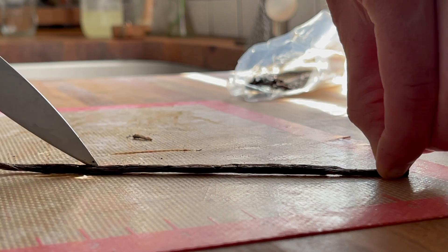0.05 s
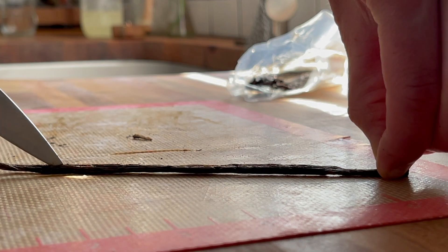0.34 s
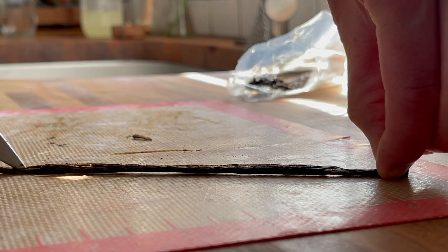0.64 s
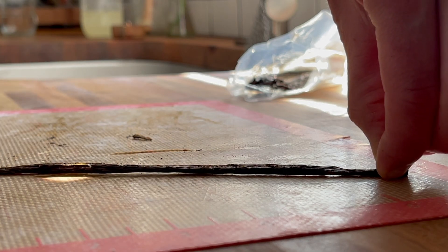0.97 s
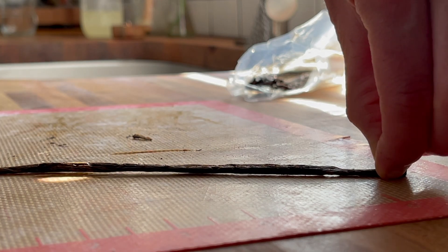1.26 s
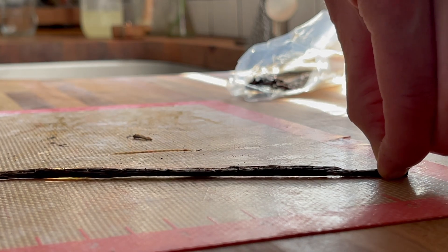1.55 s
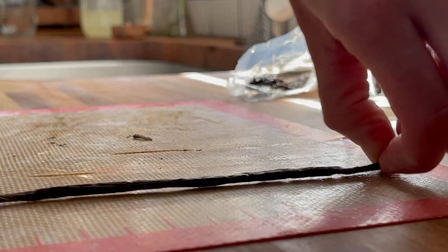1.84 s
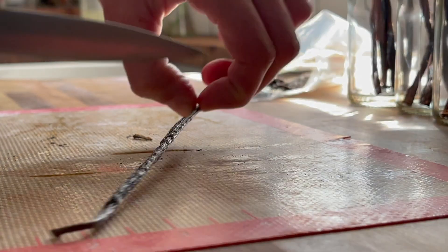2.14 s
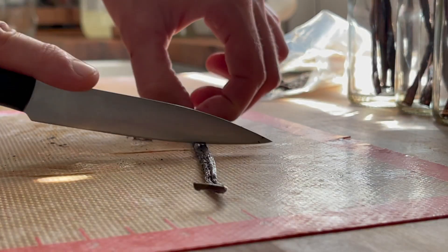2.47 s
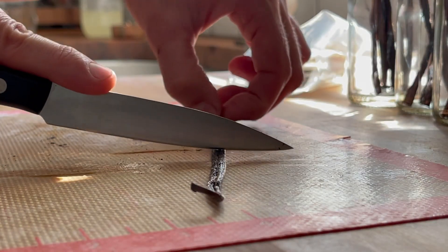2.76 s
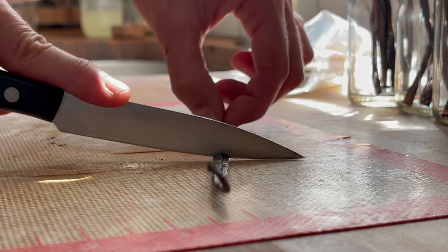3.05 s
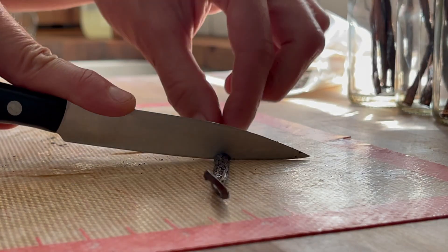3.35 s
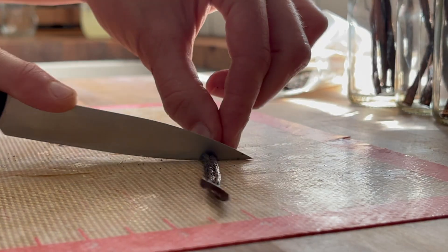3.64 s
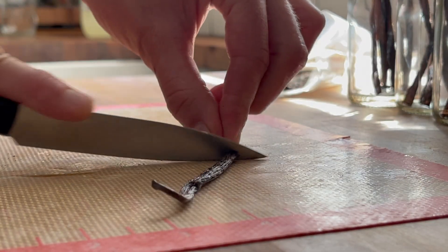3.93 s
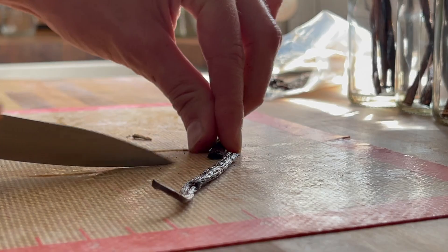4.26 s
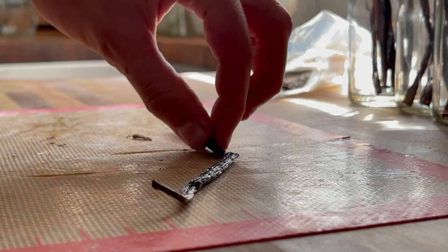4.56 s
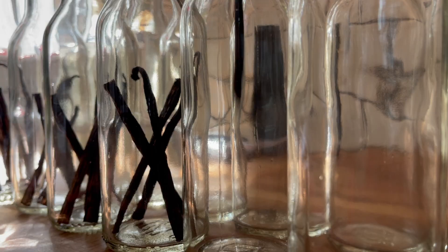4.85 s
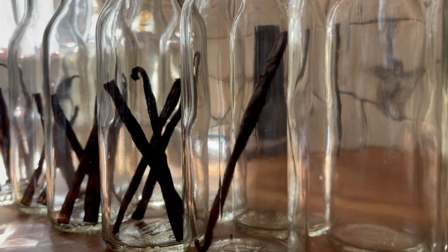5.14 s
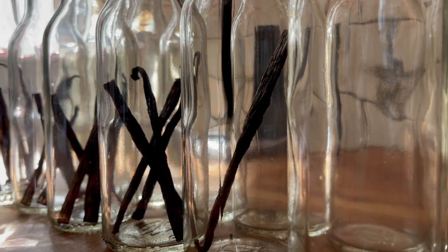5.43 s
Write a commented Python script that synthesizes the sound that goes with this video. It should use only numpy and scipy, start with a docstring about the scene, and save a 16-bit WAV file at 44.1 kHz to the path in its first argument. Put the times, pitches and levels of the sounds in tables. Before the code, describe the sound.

Heard close up in a quiet kitchen, a blade draws softly through a vanilla pod, ticking lightly before it knocks sharply on the wooden board beneath. After a short lull comes more cutting, with low rubbing, dry snaps and light taps. Then the pod lands in a small glass bottle with soft thuds, and the glass rocks and clinks against another bottle over a faint electrical hum.

```python
"""Soft scraping, small snaps and wooden knocks, then a few thuds and bright clinks of glass.
A knife slits a vanilla pod on a mat over a wooden board, knocks down off its end, then cuts it in two.
The pieces drop into a small glass bottle, which thuds, rocks and clinks against its neighbour.
It all sounds close, in a quiet kitchen with a faint mains hum."""
import sys
import numpy as np
from scipy import signal
from scipy.fft import rfft, irfft
from scipy.io import wavfile
from scipy.ndimage import uniform_filter1d

SR = 44100
rng = np.random.default_rng(int(sys.argv[2]) if len(sys.argv) > 2 else 0)


def unload_wav(signal):
    """Save mono or channel-first audio to the path in sys.argv[1] as 16-bit WAV at rate SR, clipped to [-1, 1]."""
    wavfile.write(
        sys.argv[1],
        SR,
        np.round(np.clip(np.atleast_2d(signal).T, -1, 1) * 32767).astype(np.int16),
    )


N = 246959
T = np.arange(N) / SR
HIT_T = T[:SR // 2]  # the half second that one hit lasts


def knife_knocks(push_hz=620):
    """The blade hits the board: a push, a clack, and ringing tones that depend on where it lands."""
    # Each row: pitch in Hz, fade time in seconds, level in dB if hit in the middle, and at the edge.
    board_tones = [(100, 0.14, 3, -5.5), (164.4, 0.14, 2.5, -4.5), (191.5, .24, 3.5, -5.5),
                   (284, 0.049, -31, 1), (347.6, 0.18, -8, -10.5), (393.2, 0.083, 6, -14),
                   (444.3, 0.1, -2, -1.5), (512.5, 0.062, -12.5, -1.5), (547, 0.059, -19, -4.5),
                   (532.4, 0.077, -19, -7), (649, 0.094, -29, 0), (713, 0.25, -23, -7.5),
                   (750, 0.067, -49, -3), (842, 0.15, -18, -9.5), (930, .06, -9, -16),
                   (970, 0.093, -1, -4.5), (1130, 0.025, 0.5, -29), (1177, 0.18, -1, -53),
                   (1226, 0.046, -12.5, -12), (2016, 0.014, 4, -3.5)]
    # Each row: start in seconds, level in dB, hardness in Hz, place from 0 (middle) to 1 (edge).
    hits = [(0.187, -58, 1200, 0.06), (0.2104, -42.5, 1210, 0.47), (0.4862, -45, 323, 0.69),
            (0.637, -57, 400, 0.99), (1.4046, -20, 1010, 0.99), (3.0862, -34.5, 2520, 0.36),
            (3.1822, -59, 1200, 0.12), (3.219, -42.5, 400, 0.23), (3.241, -48.5, 445, 0.44),
            (3.272, -48, 790, 0.11), (3.298, -51.5, 793, 0.021), (3.437, -62.5, 2030, 0.058),
            (3.6396, -35, 3220, 0.68), (3.705, -51, 1290, 0.03), (4.113, -57.5, 1200, 0.12),
            (4.232, -51.5, 2000, 0.68), (4.572, -61, 2510, 0)]
    out = np.zeros(N)
    hz, fade_s, middle_db, edge_db = np.transpose(board_tones)
    phase = np.pi * (push_hz * HIT_T - 1)
    push = gain(10) * (1 - 2 * phase ** 2) * np.exp(-phase ** 2)  # the board gives and springs back
    for start, db, hard_hz, place in hits:
        wood = ring(hz, fade_s, middle_db + place * (edge_db - middle_db))
        clack = gain(4) * burst(hz=680, width=1.35, fade_s=0.037, order=4)
        add(out, start, gain(db) * soften(push + wood + clack, hard_hz))
    return out


def pod_snaps():
    """The blade parts the pod or ticks on the mat: a dry crack with a brief ring."""
    # Each row: start in seconds, level in dB, centre pitch in Hz, width as a share of that pitch.
    snaps = [(0.187, -52, 3200, 1.4), (.2112, -39.5, 2200, 3.6), (.4605, -54, 3350, 1.8),
             (0.5192, -53, 4530, 1.2), (1.4058, -27.5, 3030, 1.83), (2.832, -59, 5530, 1),
             (3.034, -63, 4000, 0.7), (3.0862, -35.5, 2080, 1.8), (3.179, -54, 4360, .7),
             (3.247, -57, 4000, 0.42), (3.3, -48, 4920, 1.25), (3.4359, -51, 3380, 1.5),
             (3.6277, -43.5, 9600, 6.9), (3.6393, -29, 5900, 1.26), (3.784, -56, 7900, .8),
             (3.943, -50.5, 7360, 1), (4.08, -53, 8500, 1.1), (4.0939, -38, 5670, 2.7),
             (4.118, -51.5, 5040, 1.4), (4.2323, -41.5, 3330, 1.34), (4.375, -59, 5400, 0.52),
             (4.5541, -62, 6800, 0.88)]
    out = np.zeros(N)
    for start, db, hz, width in snaps:
        crack = burst(hz, width, fade_s=0.025, order=2)
        ringing = gain(-7) * burst(hz, width=0.16, fade_s=0.027, order=2)
        add(out, start, gain(db) * (crack + ringing))
    return out


def cutting(grains_per_s=5000, spread_db=4.1):
    """Pressing makes the board rumble; the mat rubs, fibres tear and the blade slides in tiny clicks."""
    # Each row: start in seconds, length in seconds, pressure of the hand in dB.
    pushes = [(0.0, 0.033, -55.5), (.18, 0.074, -43), (.375, 0.17, -47), (.53, 0.26, -48.5),
              (.82, 0.12, -53), (1.14, 0.34, -61), (2.45, 0.036, -60.5), (2.98, 0.18, -47.5),
              (3.21, 0.11, -46.5), (3.36, .17, -51.5), (3.66, 0.15, -51.5), (3.83, 0.12, -54),
              (4.08, 0.05, -56), (4.27, 0.16, -48), (4.46, 0.09, -50), (4.7, 0.11, -53), (5.13, 0.35, -63)]
    # Each row: start in seconds, length in seconds, tearing in dB, hiss of the blade in dB.
    cuts = [(.175, 0.054, -62.5, -65), (.41, .07, -69.5, -84), (.48, 0.48, -73, -86),
            (.605, 0.039, -64.5, -78), (2.96, 0.6, -70, -74), (3.17, 0.13, -69.5, -80),
            (3.46, 0.2, -67, -65), (3.7, 0.12, -69.5, -73), (3.945, 0.029, -63.5, -68),
            (3.985, .04, -71, -62.5), (4.04, 0.16, -69.5, -74), (4.26, 0.12, -69, -68),
            (4.4, 0.25, -72.5, -74)]
    # The tone of each of the four noises. Each row: pitch in Hz, relative level in dB.
    board_rumble = [(15, -51), (25, 9), (64, -8), (103, 5), (152, -14), (200, -0.5), (248, -15),
                    (339, -34.5), (384, -21.5), (500, -16), (650, -63), (1100, -120)]
    mat_rub = [(200, -33.5), (300, -5), (390, -12), (575, -13), (700, -10), (850, -17.5), (990, -11.5),
               (1450, -25), (2100, -15.5), (4000, -35.5)]
    fibre_tear = [(1200, -3.5), (2100, 1), (3100, 1.5), (4000, -11), (6000, -4.5), (8500, -9.5),
                  (12000, -53)]
    blade_hiss = [(4500, -7.5), (7500, -7), (9300, -4), (11000, -13), (13000, -8), (16000, -14)]
    press, = stroke_forces(pushes)
    tear, slide = stroke_forces(cuts)
    out = gain(-2) * press * colour(rng.standard_normal(N), board_rumble)
    for force, db, spectrum in (press, -17, mat_rub), (tear, -1, fibre_tear), (slide, -2, blade_hiss):
        sizes = gain(spread_db * np.minimum(rng.exponential(1, N), 5))
        grains = sizes * rng.choice([-1, 1], N) * (rng.random(N) < grains_per_s / SR)
        out += gain(db) * force * colour(grains, spectrum)
    return out


def pod_landings(vary_db=3):
    """The leathery pod slaps the glass and the bottle thuds on the board, a little differently each time."""
    # The standing bottle and the air in it. Each row: pitch in Hz, fade time in seconds, level in dB.
    bottle_tones = [(78, 0.11, -6), (107, 0.2, -15.5), (181.4, 0.26, -3), (307.8, 0.26, -8.5),
                    (325, 0.19, -14), (383.4, 0.14, 4), (411, 0.28, -2), (525, 0.051, -10.5),
                    (680, 0.076, -23), (737, 0.059, 8.5), (855, 0.045, -2), (1058, 0.04, -3),
                    (1224, 0.08, -6), (1500, 0.15, -6), (1615, 0.16, -1), (2020, 0.046, -2),
                    (2260, 0.027, 0)]
    # Each row: start in seconds, thud in dB, hardness in Hz, slap in dB.
    landings = [(4.851, -67.5, 1300, -53.5), (4.9185, -35, 517, -46), (4.939, -45, 546, -47),
                (5.0064, -38.5, 480, -53), (5.035, -55, 840, -46.5), (5.054, -59, 990, -48),
                (5.146, -79, 1000, -56.5), (5.445, -68, 1220, -54), (5.472, -66, 1595, -53),
                (5.492, -80, 2000, -51), (5.497, -38, 1100, -27), (5.503, -34, 2460, -27),
                (5.517, -40.5, 1660, -39)]
    out = np.zeros(N)
    hz, fade_s, tone_db = np.transpose(bottle_tones)
    for start, thud_db, hard_hz, slap_db in landings:
        tones = ring(hz, fade_s, tone_db + vary_db * rng.standard_normal(len(hz)))
        bump = gain(-4) * burst(hz=145, width=2.7, fade_s=0.24, order=2)
        slap_hz = 1193 * (hard_hz / 1000) ** 0.15  # harder landings sound brighter
        slap = burst(slap_hz, width=1, fade_s=0.034, order=4)
        add(out, start, gain(thud_db) * soften(tones + bump, hard_hz) + gain(slap_db) * slap)
    return out


def glass_clinks(swell_s=0.00065, waver_db=4, waver_s=0.006, damp_s=0.014):
    """Glass meets glass: a hard tick, then a ring that spreads and wavers as the bottle rocks."""
    # The bottle's wall, its foot and its neighbour. Each row: pitch in Hz, fade in seconds, level in dB.
    wall = [(4731, .1, -25), (5208, .18, -11), (5224, .17, 0), (5297, .16, -9), (6414, .24, -21),
            (9550, .14, -18), (11815, .1, -25)]
    foot = [(3495, .16, -18), (6362, .14, -16), (11895, .09, -13), (12263, .2, 0), (12914, .07, -9),
            (13197, .1, -8)]
    neighbour = [(3480, .15, -18), (5297, .16, -13), (6592, .14, 0)]
    # Each row: start in seconds, tick in dB, tick pitch in Hz, then wall, foot and neighbour in dB.
    clinks = [(4.853, -72, 5000, -77, -100, -71), (4.918, -30.5, 8000, -48.5, -43.5, -52),
              (4.938, -36, 6400, -38, -79, -75), (5.0055, -50, 7000, -71, -71, -57),
              (5.033, -64, 4970, -55, -84, -69), (5.1087, -43.5, 4100, -89, -100, -90),
              (5.147, -70, 5070, -69.5, -99, -76), (5.446, -55, 6440, -84, -80, -58),
              (5.476, -63, 5000, -64, -76, -78), (5.4985, -30.5, 5400, -38, -59, -63),
              (5.5545, -40, 5100, -36, -80, -67), (5.579, -48, 5950, -46, -63, -70),
              (5.599, -50, 6000, -41, -70, -70)]
    out = np.zeros(N)
    rings = np.array([ring(*np.transpose(tones)) for tones in (wall, foot, neighbour)])
    rings *= 1 - np.exp(-HIT_T / swell_s)
    waits = np.diff([row[0] for row in clinks], append=T[-1] + 1)
    window = 1 + int(waver_s * SR)
    for (start, tick_db, tick_hz, *ring_db), wait in zip(clinks, waits):
        rocking = [unit(uniform_filter1d(rng.standard_normal(len(HIT_T)), window)) for _ in rings]
        voices = rings * gain(waver_db * np.array(rocking))
        voices[0] *= np.exp(-np.maximum(HIT_T - wait, 0) / damp_s)  # the next touch quiets the wall
        tick = burst(tick_hz, width=0.73, fade_s=0.0076, order=3)
        add(out, start, gain(tick_db) * tick + gain(ring_db) @ voices)
    return out


def kitchen_echo(sound, delay_s=0.005):
    """Sound bounces round the kitchen, each pitch fading at its own speed."""
    # Each row: pitch in Hz, fade time in seconds, level in dB.
    echo_bands = [(99, 0.2, -0.5), (309, 0.41, -9.5), (550, 0.354, -1.5), (779, 0.55, -10),
                  (1356, 0.25, -3.5), (3000, 0.33, -5.5), (6300, 0.38, -9), (9780, .26, -9.5),
                  (15800, 0.16, -44)]
    hz, t, noise = signal.stft(rng.standard_normal(SR), SR, nperseg=256)
    fade_s = look_up(echo_bands, hz)[:, None]
    level = gain(look_up(echo_bands, hz, 2))[:, None] * np.sqrt(2 * np.log(1000) / (fade_s * SR))
    tail = signal.istft(noise * level * fade(t, fade_s), SR, nperseg=256)[1]
    return signal.fftconvolve(sound, np.pad(tail, (round(delay_s * SR), 0)))[:N]


def background(hum_hz=120):
    """Still room air and a faint mains hum."""
    # Each row: pitch in Hz, relative level in dB.
    air_spectrum = [(12, -40), (20, -17.5), (27, 1.5), (91, -9), (127, 2), (172, -17), (216, -6.5),
                    (301, -21), (377, -13), (446, -17.5), (660, -18), (923, -21), (1220, -20.5),
                    (2820, -28.5), (7000, -36.5), (16000, -36)]
    air = gain(-62) * colour(rng.standard_normal(N), air_spectrum)
    hum = gain(-80) * np.sqrt(2) * np.sin(2 * np.pi * hum_hz * T)
    return air + hum


def stroke_forces(rows, build_share=0.21, sag_db_per_s=11, release_db_per_s=223):
    """One force curve per level column: each stroke builds up, eases off and is let go."""
    force = np.zeros((len(rows[0]) - 2, N))
    for start, length, *db in rows:
        t = np.maximum(T - start, 0)
        build = np.minimum(t / (build_share * length), 1)
        ease = gain(-sag_db_per_s * t - release_db_per_s * np.maximum(t - length, 0))
        force = np.maximum(force, np.outer(gain(db), build * ease))
    return force


def ring(hz, fade_s, db):
    """The fading tones of a struck object; every second one starts the opposite way."""
    signs = (-1) ** np.arange(len(hz))
    tones = np.sin(2 * np.pi * np.outer(hz, HIT_T)) * fade(HIT_T, fade_s[:, None])
    return (signs * gain(db)) @ tones


def burst(hz, width, fade_s, order, rise_s=0.0015):
    """A click or slap: countless short tones spread evenly in a band around hz."""
    spread = np.sqrt(1 + width ** 2 / 4) + width / 2
    edges_hz = [min(hz / spread, 15000), min(hz * spread, 20000)]
    band = signal.butter(order, edges_hz, "band", fs=SR, output="sos")
    decay = fade(HIT_T, fade_s)
    shape = (1 - np.exp(-HIT_T / rise_s)) * decay
    phases = np.angle(rfft(rng.standard_normal(len(HIT_T)) * shape))
    even_noise = irfft(np.exp(1j * phases), len(HIT_T))  # every pitch equally strong
    click = signal.sosfilt(band, even_noise * decay ** 0.2)
    return click * np.linalg.norm(shape) / np.linalg.norm(click)


def soften(sound, hard_hz):
    """A soft touch lasts longer, so tones above hard_hz stay weak."""
    return signal.lfilter(*signal.butter(2, hard_hz, fs=SR), sound)


def colour(sound, spectrum):
    """Shapes the lows and highs of a sound, then sets its average strength to 1."""
    levels = gain(look_up(spectrum, np.fft.rfftfreq(N, 1 / SR)))
    return unit(irfft(rfft(sound) * levels, N))


def look_up(rows, hz, column=1):
    """Reads between a table's rows along a musical (logarithmic) pitch scale."""
    rows = np.array(rows, float)
    return np.interp(np.log(hz + 1), np.log(rows[:, 0] + 1), rows[:, column])


def fade(t, fade_s):
    """Falls by 60 dB in the fade time."""
    return np.exp(-np.log(1000) * t / fade_s)


def gain(db):
    """Turns decibels into a multiplier."""
    return 10 ** (np.asarray(db) / 20)


def unit(sound):
    """Sets the average strength (rms) to 1."""
    return sound / np.sqrt(np.mean(sound ** 2) + 1e-20)


def add(mix, start_s, sound):
    """Mixes a sound in at its start time."""
    part = mix[round(start_s * SR):][:len(sound)]
    part += sound[:len(part)]


def scene():
    """Board, pod and bottles with their echo, plus the cutting noise and the quiet room."""
    knife = knife_knocks() + pod_snaps()
    glass = pod_landings() + glass_clinks()
    echo = kitchen_echo(knife + gain(-8) * glass)
    return (knife + glass + echo + cutting() + background())[None]


def record(dry):
    """Removes the very highest treble, above 16200 Hz."""
    low_pass = signal.firwin(511, 16200, window=("kaiser", 9), fs=SR)
    return signal.oaconvolve(dry, low_pass[None], "same")


dry = scene()
out = record(dry)
unload_wav(out)
```